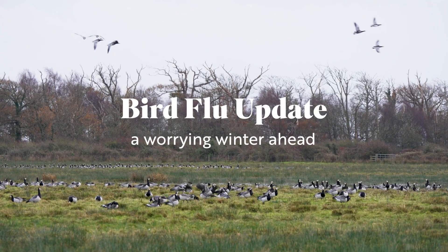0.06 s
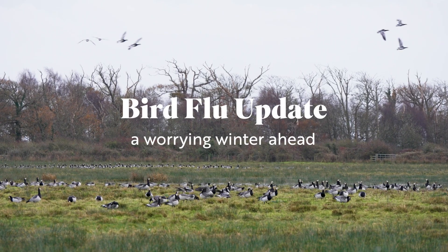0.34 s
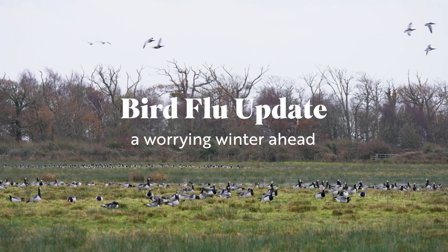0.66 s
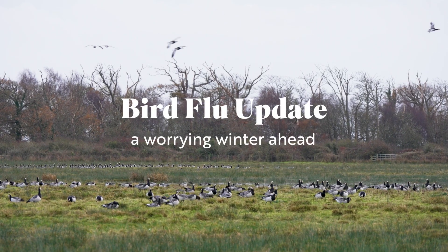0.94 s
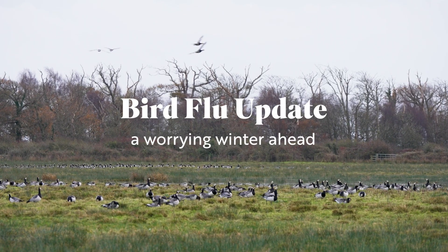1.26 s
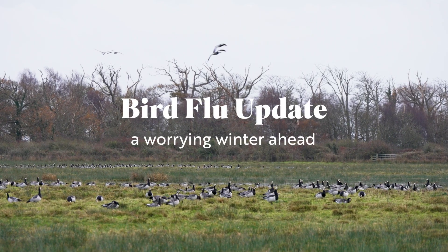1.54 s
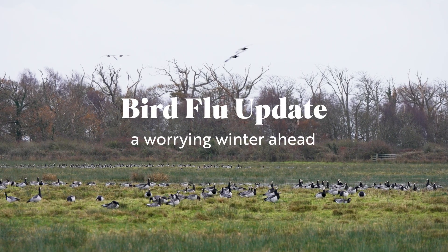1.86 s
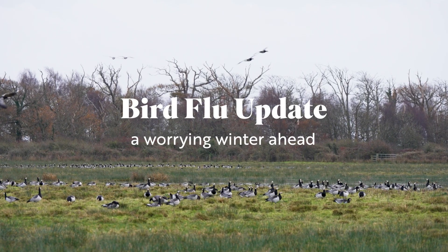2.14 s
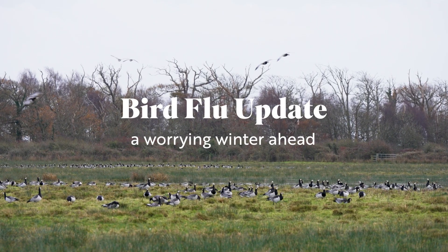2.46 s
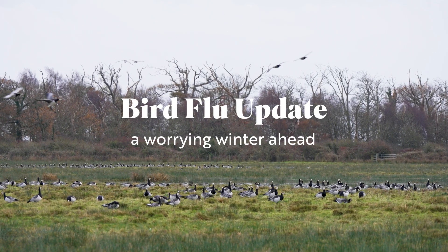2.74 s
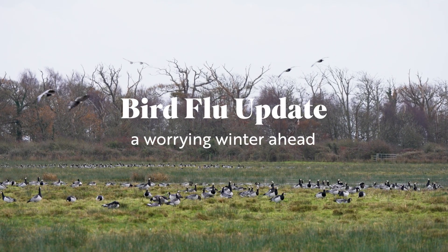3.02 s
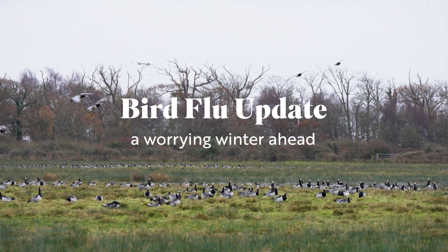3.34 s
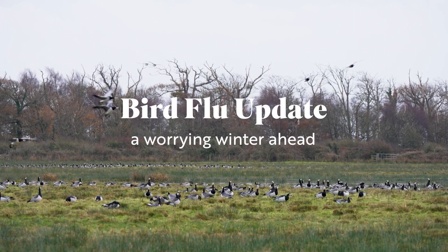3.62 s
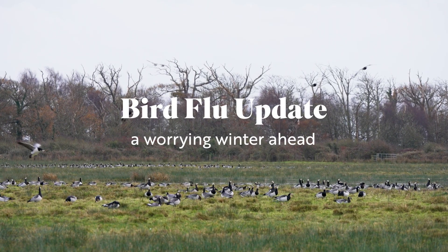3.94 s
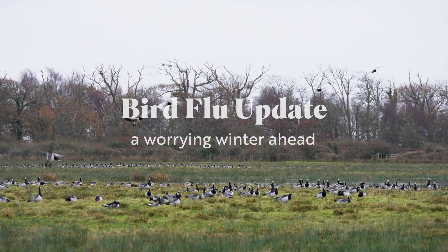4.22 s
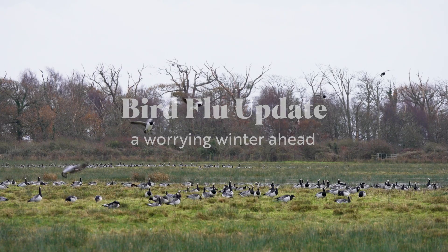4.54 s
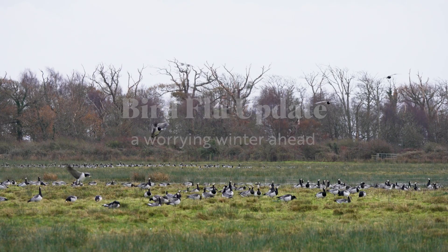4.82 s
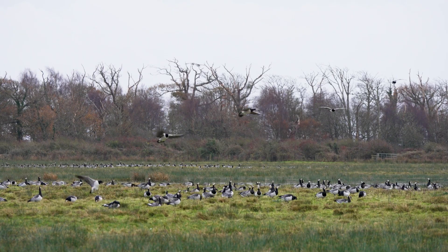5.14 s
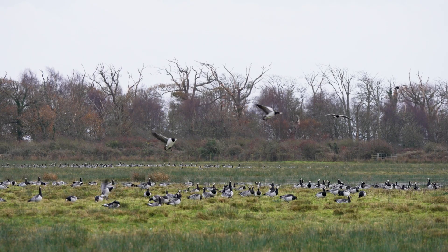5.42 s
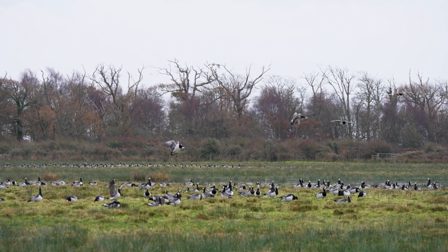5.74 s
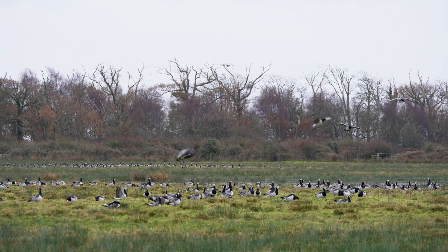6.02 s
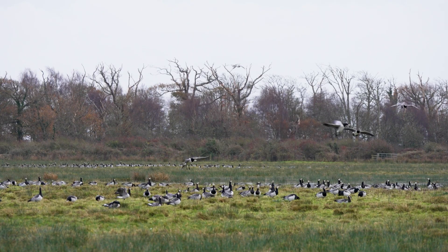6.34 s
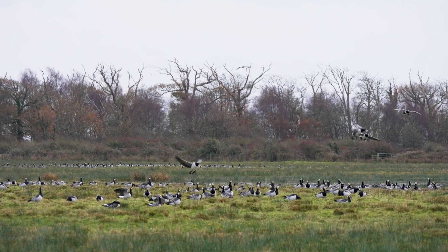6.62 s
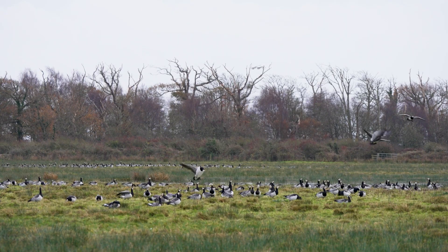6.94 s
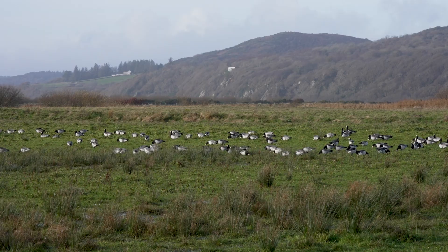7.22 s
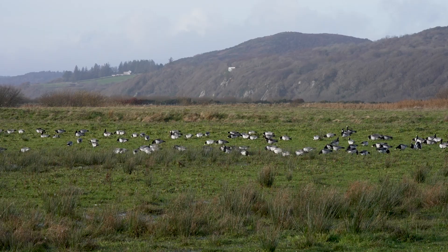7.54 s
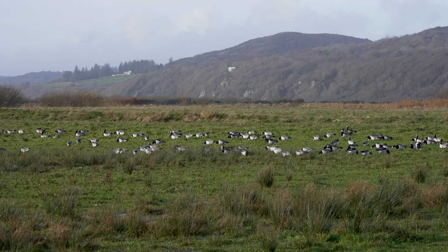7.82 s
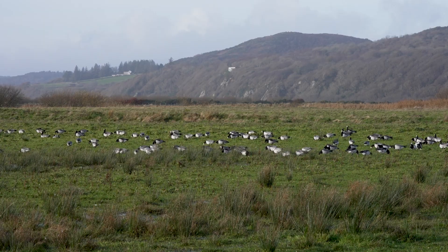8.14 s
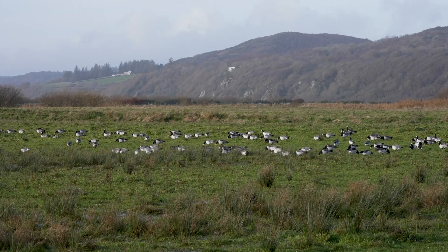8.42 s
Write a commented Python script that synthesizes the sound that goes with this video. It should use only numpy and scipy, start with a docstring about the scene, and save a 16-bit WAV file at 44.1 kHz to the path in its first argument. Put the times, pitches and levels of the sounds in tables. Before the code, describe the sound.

Out in a field, overlapping nasal goose honks stand out from a distant chattering flock, with a faint echo from trees. A close bird yelps a few times at the start, as wind briefly buffets the microphone. Later the wind rumbles up again under shriller calls and low grunts. Finally the chorus drops away, leaving a handful of soft, creaky geese in still country air.

```python
"""A large flock of geese yaps on open grassland, near birds over a babble of far ones, with soft grunts.
Each honk rises and falls in pitch as membranes clap in the bird's chest and ring its throat and bill.
Early on, gusts bump the microphone and a close bird gives clear yelps. From about four seconds the
breeze swells and shrill calls join in. After seven seconds the field fades into a quieter one,
where a few geese call in low, creaky pairs."""
import sys
import numpy as np
from scipy import signal
from scipy.fft import rfft, irfft, next_fast_len
from scipy.io import wavfile

SR = 44100
rng = np.random.default_rng(int(sys.argv[2]) if len(sys.argv) > 2 else 0)


def log_audio(samples):
    """Write samples as a 16-bit WAV file to the path given in sys.argv[1]."""
    # one column per channel
    frames = np.atleast_2d(samples).T
    # limit to full scale, then quantise
    limited = np.clip(frames, -1, 1)
    pcm = np.round(limited * 32767).astype(np.int16)
    wavfile.write(sys.argv[1], SR, pcm)


N = 378378


def undb(db):
    """Turn decibels into a gain to multiply by."""
    return 10 ** (np.asarray(db) / 20)


def unit(x):
    """Scale a sound to an average strength (rms) of 1."""
    return x / np.sqrt(np.mean(x ** 2) + 1e-20)


def curve(rows, t):
    """Join the points of a table with straight lines."""
    rows = np.asarray(rows)
    return np.interp(t, rows[:, 0], rows[:, 1])


def add(track, start_s, sound):
    """Mix a sound into a track."""
    i = int(start_s * SR)
    a, b = max(i, 0), min(i + len(sound), N)
    if b > a:
        track[a:b] += sound[a - i:b - i]


def wander(n, rate_hz):
    """Drift to a new random value `rate_hz` times a second."""
    at = np.arange(n) * rate_hz / SR
    points = int(at[-1]) + 2
    return np.interp(at, np.arange(points), rng.standard_normal(points))


def resonance(f, hz, q):
    """Favour the frequencies near `hz`; a higher `q` rings more narrowly."""
    return (1 + 1j * q * (f / hz - hz / f)) ** -2


def passband(f, low_hz, high_hz, order):
    """Let through one band; a higher order gives steeper edges."""
    return ((1 + (low_hz / f) ** order) * (1 + (f / high_hz) ** order)) ** -.5


def noise(spectrum):
    """Noise shaped by rows of frequency_hz, gain_db."""
    f = np.fft.rfftfreq(N, 1 / SR) + 1
    hz, db = np.transpose(spectrum)
    gain = undb(np.interp(np.log(f), np.log(hz), db))
    return unit(irfft(rfft(rng.standard_normal(N)) * gain, N))


# How much of the big flock's field is heard: time_s, gain_db
FIELD_FADE = [(0, 2), (6.6, 1.5), (7.0, -0.5), (7.25, -6), (7.45, -9.5), (7.6, -32), (8.58, -56)]


def big_field(t):
    """The big field's gain, which falls away after seven seconds."""
    return undb(curve(FIELD_FADE, t))


# The tone of the air in each field: frequency_hz, gain_db
BIG_FIELD_AIR = [(20, 1.5), (60, -11), (120, -1), (200, 3), (280, 1.5), (400, -9), (550, -18.5),
                 (1000, -9.5), (3000, -22.5), (8000, -27), (16000, -28)]
QUIET_FIELD_AIR = [(20, 1.5), (60, -3), (150, -6), (300, -8), (600, -11.5), (1000, -14.5), (2000, -24),
                   (5000, -33.5), (16000, -34.5)]


def country_air(t, big_db=-52, quiet_db=-59):
    """The low drone of the countryside gives way to a quieter one."""
    big = noise(BIG_FIELD_AIR) * undb(big_db + 1.3 * wander(N, 9.2))
    quiet = noise(QUIET_FIELD_AIR) * undb(quiet_db)
    fade = big_field(t)
    return fade * big + np.sqrt(np.clip(1 - fade, 0, 1)) * quiet


# The tone of the hiss: frequency_hz, gain_db
HISS_TONE = [(30, 3), (300, 8.5), (1000, -5.5), (3000, -20.5), (6000, 5), (16000, 2.5)]


def wide_hiss(t):
    """A faint hiss sounds wide because left and right are opposites."""
    hiss = noise(HISS_TONE) * (big_field(t) * undb(-69.5) + undb(-92))
    return np.array([hiss, -hiss])


# The wind's rumble: frequency_hz, gain_db
WIND_TONE = [(15, -8), (35, -2.5), (70, -3), (110, -11.5), (200, -21), (400, -37.5), (900, -63)]
# The breeze rising and dying away: time_s, level_db
BREEZE = [(0, -62), (1, -67), (2.7, -65), (3.6, -53.5), (4.4, -47.5), (5.2, -48), (5.9, -41), (6.7, -52.5),
          (7.2, -57.5), (7.45, -75), (8.58, -64.5)]
# Short gusts: peak_s, half_width_s, level_db
GUSTS = [(.25, 0.058, -47), (.45, 0.034, -37.5), (.57, 0.036, -50.5), (4.1, 0.035, -42), (4.4, 0.084, -41),
         (4.8, .025, -55)]


def wind(t):
    """Gusts ride on a slow breeze and buffet the microphone."""
    gusts = sum(undb(db) * np.exp(-((t - peak_s) / width_s) ** 2) for peak_s, width_s, db in GUSTS)
    return noise(WIND_TONE) * (undb(curve(BREEZE, t)) + gusts)


def treeline(x, fade_s=1.0, rise_s=0.0053, echo_db=-27):
    """Trunks and rough ground scatter a thin, dull echo."""
    t = np.arange(SR) / SR
    scatter = rng.standard_normal(SR) * undb(-60 * t / fade_s) * (1 - np.exp(-t / rise_s))
    dull = signal.sosfilt(signal.butter(2, 3000, fs=SR, output="sos"), scatter)
    return undb(echo_db) * signal.fftconvolve(x, unit(dull) / np.sqrt(SR))[:N]


def soft_ground(x, dip_hz=550, width_hz=100, dip_db=-6):
    """The bounce off soft pasture weakens a band just under the calls, so their falling tails fade."""
    f = np.fft.rfftfreq(N, 1 / SR)
    return irfft(rfft(x) * undb(dip_db * np.exp(-((f - dip_hz) / width_hz) ** 2)), N)


def over_grass(x, scatter_db=-4, decay_s=0.0043, size=600):
    """Tiny echoes off tufts of grass blur each call in its own way."""
    echoes = rng.standard_normal(size) * np.exp(-np.arange(size) / SR / decay_s)
    path = unit(echoes) * undb(scatter_db) / np.sqrt(size)
    path[0] += 1  # the direct sound
    return signal.fftconvolve(x, path)[:len(x)]


def buzz(phase, harmonics):
    """One sharp pulse per cycle, made of equally strong harmonics."""
    half = np.pi * (phase % 1) + 1e-9
    return unit(np.sin((2 * harmonics + 1) * half) / np.sin(half) - 1)


def voice_box(hz, repeat, slip, rough, jitter=0.043, flutter=0.62):
    """Membranes clap once a cycle; `slip` stresses one clap in every `repeat`, and air rasps through."""
    n, slip = len(hz), np.clip(slip, 0, 1)
    phase = np.cumsum(hz * (1 + (0.0036 + jitter * rough) * wander(n, 500))) / SR  # in cycles
    claps = (1 - slip) * buzz(phase, 12) + slip * buzz(phase / repeat, 12 * repeat)
    rasp = rng.standard_normal(n) * (1 + np.cos(2 * np.pi * phase / repeat))
    return unit(claps) * (1 + flutter * rough * wander(n, 271.3)) + rough * rasp, phase


def throat_and_bill(source, phase, push, base_db, throat_hz, throat_db, bill_hz, bill_db,
                    throat_q, pipe_db=-4, bill_q=1.55):
    """The windpipe passes the base note, the throat gives the honk and the bill adds a nasal edge."""
    n = len(source)
    size = next_fast_len(n + 256)
    f, spectrum = np.fft.rfftfreq(size, 1 / SR) + 1, rfft(source, size)
    ring = resonance(f, throat_hz, throat_q) * passband(f, 0.28 * throat_hz, 1.696 * throat_hz, order=10)
    # a lower windpipe ring comes forward as the bill shuts at the end
    pipe = irfft(spectrum * ring * np.abs(resonance(f, hz=1130, q=5)), size)[:n]
    shutting = 1 + 5 * np.linspace(0, 1, n) ** 6
    throat = irfft(spectrum * ring, size)[:n] + undb(pipe_db) * pipe * shutting
    # the bill rings a quarter cycle apart from the throat, so the two do not cancel
    quarter_turn = 1j * np.exp(1j * np.angle(ring))
    edge = np.abs(resonance(f, bill_hz, bill_q)) * passband(f, 1900, 6870, order=10)
    bill = irfft(spectrum * quarter_turn * edge, size)[:n] * push ** 0.16  # opens with the push of air
    base = np.sin(2 * np.pi * phase)
    return undb(base_db) * unit(base) + undb(throat_db) * unit(throat) + undb(bill_db) * unit(bill)


def honk(length_s, top_hz, top_at, arch, repeat, slip, rough, *tone, attack=.9, swell=1.05,
         wobble=.008, collapse=.05, settling=.6, throat_q=2.05, pipe_db=-4, bill_q=1.6):
    """One push of air: pitch and loudness rise and fall, and a hoarse start settles to a cleaner tail."""
    progress = np.linspace(0, 1, int(length_s * SR))
    push = np.abs(np.sin(np.pi * progress ** attack))
    bend = 1 - arch * (progress - top_at) ** 2
    # the pitch wobbles, then collapses as the air runs out
    pitch = top_hz * (bend + wobble * wander(len(progress), 70.5) - collapse * progress ** 10)
    # the membranes slip to their slow rate most when the push is weak
    slipping = slip * (1 + .5 * (.8 - push))
    hoarse = rough * (1.05 + settling * np.cos(np.pi * progress))
    source, phase = voice_box(pitch, repeat, slipping, hoarse)
    call = throat_and_bill(over_grass(source), phase, push, *tone, throat_q, pipe_db, bill_q)
    return 1.29 * push ** swell * call


# How excited the far birds are: time_s, gain_db
EXCITEMENT = [(0, 6.5), (.5, 2), (2.3, 2), (3, 4), (4, -1.5), (5, 1.5), (6, -1), (6.8, 2), (7.5, -1)]


def far_geese(t, count=300, level_db=-57.5, spread_db=11, pitch_hz=850, throat_hz=1780, bill_hz=4100):
    """Hundreds of far calls, each with its own pitch and throat, merge into a babble."""
    out = np.zeros(N)
    top_at, slip, rough = 0.3422, 1.0, 0.12
    for k, (late, long, high, bright, loud, deep) in enumerate(rng.uniform(-1.1, 1, (count, 6))):
        db = level_db + spread_db * loud
        shape = .1 + 0.028 * long, pitch_hz * (1 + .11 * high), top_at, 0.477 + 0.19 * deep
        tone = db - 20, throat_hz * (1 + 0.14 * bright), db, bill_hz, db - 23
        start_s = (k + 2 * late) / count * N / SR - .05
        add(out, start_s, honk(*shape, 2 + k % 2, slip, rough, *tone))
    return big_field(t) * undb(curve(EXCITEMENT, t)) * soft_ground(out)


# Soft, low grunts between the honks: middle_s, pitch_hz, level_db
GRUNTS = [(0.029, 301, -48), (0.481, 268.4, -44.5), (0.921, 255.6, -45.5), (1.822, 287, -48.5),
          (2.35, 287, -47.5), (2.95, 275, -46.5), (3.599, 301, -45), (3.659, 279, -49), (4.028, 324, -51.5),
          (4.302, 270.5, -46.5), (6.579, 251, -47), (6.701, 290, -53), (7.337, 295, -53), (7.64, 296, -56),
          (7.94, 286, -57), (8.241, 263, -54)]


def grunting_geese(length_s=.09, fall=0.16, overtone_db=-22):
    """The birds keep in touch with short, dull notes that sag in pitch."""
    out = np.zeros(N)
    from_middle = np.linspace(-.5, .5, int(length_s * SR))
    for middle_s, hz, db in GRUNTS:
        pitch = hz * (1 - fall * from_middle + 0.013 * wander(len(from_middle), 42))
        angle = 2 * np.pi * np.cumsum(pitch) / SR
        note = np.sin(angle) + undb(overtone_db) * np.sin(2 * angle)
        add(out, middle_s - length_s / 2, undb(db) * np.cos(np.pi * from_middle) ** 2 * note)
    return out


# Low creaks: start_s, length_s, pitch_hz, repeat_cycles, base_db, throat_hz, throat_db, bill_db
CREAKS = [(7.454, 0.1, 697, 2, -72, 1940, -57, -59.5), (7.57, 0.13, 744, 3, -76, 1900, -55, -86),
          (7.684, .091, 737, 3, -58.5, 1840, -56.5, -71.5), (7.807, 0.097, 806, 2, -59, 2060, -50.5, -66),
          (7.879, .11, 830, 3, -69, 2320, -53.5, -66), (8.087, 0.11, 738, 3, -56.5, 2070, -58.5, -64.5),
          (8.181, 0.095, 774, 3, -59, 2270, -53.5, -67.5), (8.355, 0.097, 742, 3, -53.5, 2320, -56, -60.5),
          (8.453, .098, 741, 2, -52.5, 2140, -55.5, -54.5), (8.543, .072, 757, 1, -61, 2020, -63, -71)]


def creaking_geese(top_at=.42, arch=0.519, slip=1, rough=0.45, bill_hz=3930):
    """Birds in the quiet field creak as their membranes slip to half or third rate."""
    out = np.zeros(N)
    for start_s, length_s, hz, repeat, base_db, throat_hz, throat_db, bill_db in CREAKS:
        tone = base_db, throat_hz, throat_db, bill_hz, bill_db
        add(out, start_s, honk(length_s, hz, top_at, arch, repeat, slip, rough, *tone,
                               swell=1.04, wobble=0.014, throat_q=1.93, pipe_db=-5, bill_q=2.3))
    return out


# Clear notes: start_s, length_s, pitch_hz, top_at (0-1 along the call), throat_hz, throat_db
CLEAR_NOTES = [(7.58, 0.081, 695, 0.6, 2570, -57.5), (7.799, 0.092, 764, 0.27, 2110, -51),
               (7.886, .078, 719, 0.68, 2730, -55), (8.093, .086, 670, .48, 2150, -49),
               (8.359, 0.073, 674, .44, 2290, -48)]


def bugling_geese(arch=.64, repeat=1, slip=0, rough=0.2, bill_hz=3630):
    """A second voice sounds over some creaks, clear because its membranes do not slip."""
    out = np.zeros(N)
    for start_s, length_s, hz, top_at, throat_hz, db in CLEAR_NOTES:
        tone = db - 19, throat_hz, db, bill_hz, db - 15
        add(out, start_s, honk(length_s, hz, top_at, arch, repeat, slip, rough, *tone,
                               swell=.8, throat_q=4.0, pipe_db=-18))
    return out


# Shrill calls: start_s, length_s, pitch_hz, repeat_cycles, base_db, throat_db, bill_hz, bill_db
SHRIEKS = [(4.502, 0.079, 930, 1, -73, -45, 6660, -55.5), (4.8, 0.065, 820, 2, -75, -53, 5230, -59),
           (5.007, 0.15, 807, 2, -68, -46.5, 5050, -58), (5.571, 0.11, 938, 2, -82, -48, 5200, -56),
           (5.808, 0.063, 920, 2, -69, -71, 4930, -62.5), (6.027, 0.18, 929, 2, -66, -56.5, 5000, -60),
           (6.359, 0.099, 898, 2, -53, -51, 4070, -62), (6.478, .11, 857, 2, -60, -42, 4970, -57.5),
           (6.587, 0.093, 886, 1, -58, -43, 5500, -54.5), (6.623, 0.1, 908, 2, -53, -40, 4450, -64),
           (6.699, 0.065, 918, 2, -53.5, -56, 4260, -61), (6.862, 0.14, 805, 2, -58.5, -47, 5230, -60),
           (6.967, .13, 888, 2, -55.5, -44, 4270, -64)]


def shrieking_geese(top_at=0.333, arch=0.326, slip=0.74, rough=0.3, throat_hz=1870):
    """Thin, falling calls ring brightly through a wide open bill."""
    out = np.zeros(N)
    for start_s, length_s, hz, repeat, base_db, throat_db, bill_hz, bill_db in SHRIEKS:
        tone = base_db, throat_hz, throat_db, bill_hz, bill_db
        add(out, start_s, honk(length_s, hz, top_at, arch, repeat, slip, rough, *tone,
                               attack=0.82, swell=0.8, bill_q=2.06))
    return out


# Long, clear yelps: start_s, length_s, pitch_hz, catch_depth (0-1), level_db, bill_vs_throat_db
YELPS = [(0.664, 0.15, 870, .065, -26, -21), (1.29, 0.14, 861, 0.05, -26, -26.5),
         (1.493, 0.103, 852, 0.05, -34, -24), (2.025, .13, 861, 0, -32.5, -17.5)]


def yelping_goose(top_at=.54, arch=0.43, sag_db=9, crack_s=0.0096):
    """A close bird's voice cracks into a clean note, catches in the middle and cracks out again."""
    out = np.zeros(N)
    for start_s, length_s, hz, depth, db, bill_db in YELPS:
        t = np.arange(start_s, start_s + length_s, 1 / SR)
        progress = (t - start_s) / length_s
        catch = depth * np.exp(-((progress - .46) / 0.138) ** 2)  # dips both pitch and level
        pitch = hz * (1 - arch * (progress - top_at) ** 2 - catch)
        push_db = db - sag_db * (2 * (progress - top_at)) ** 2 - 65 * catch
        push = undb(push_db) * signal.windows.tukey(len(t), .22)
        crack = np.exp(-((t - t[0]) / (2 * crack_s)) ** 4) + np.exp((t - t[-1]) / crack_s)
        source, phase = voice_box(pitch, repeat=3, slip=crack, rough=0.027 + crack)
        call = throat_and_bill(source, phase, push, base_db=-15.5, throat_hz=1650, throat_db=0,
                               bill_hz=3600, bill_db=bill_db, throat_q=2.6)
        add(out, start_s, push * call)
    return out


# Near honks: start_s, length_s, pitch_hz, repeat_cycles, roughness (0-1), throat_hz, throat_db, bill_db
HONKS = [(-.042, 0.083, 918, 1, 0.08, 1520, -32.5, -73), (0.034, .19, 804, 3, 0.41, 1530, -33.5, -52.5),
         (.124, 0.11, 897, 2, 0.14, 1690, -33.5, -54), (.212, 0.098, 857, 2, 0.49, 1660, -39, -58.5),
         (0.351, .13, 849, 2, 0.61, 1610, -33.5, -59.5), (0.563, .125, 887, 2, 0.16, 2180, -39.5, -50),
         (0.621, 0.08, 800, 2, 0.1, 2060, -37, -55), (0.868, 0.086, 903, 2, 0.16, 2020, -38, -59.5),
         (0.923, .092, 814, 3, 0.17, 1430, -34.5, -64), (1.06, .12, 890, 2, 0.31, 1680, -33, -57),
         (1.209, 0.13, 897, 2, 0.5, 1520, -42, -83), (1.399, 0.094, 809, 3, 0.4, 1690, -37.5, -60),
         (1.557, .075, 745, 2, 0.42, 1180, -40, -67), (1.63, 0.14, 874, 2, 0.54, 1740, -40.5, -60),
         (1.793, 0.16, 889, 2, 0.41, 1760, -44.5, -61), (2.027, .11, 850, 3, 0.42, 1380, -37.5, -69),
         (2.314, 0.098, 881, 2, 0.3, 1680, -34.5, -56), (2.421, 0.077, 869, 2, 0.66, 1740, -44.5, -59.5),
         (2.458, 0.12, 770, 3, 0.36, 1520, -37, -64), (2.585, 0.12, 894, 2, 0.53, 1810, -34, -54.5),
         (2.778, 0.071, 944, 2, 0.25, 1930, -40, -59), (2.823, 0.075, 848, 2, 0.57, 1710, -38, -65),
         (2.874, .13, 767, 3, 0.65, 1460, -37, -61.5), (3.082, 0.15, 836, 2, 0.34, 1740, -39.5, -66),
         (3.143, 0.13, 907, 2, 0.21, 1810, -31, -58), (3.212, 0.088, 802, 3, 0.6, 1630, -43, -64),
         (3.277, 0.14, 903, 2, 0.49, 2000, -42, -58), (3.42, .115, 897, 3, 0, 1320, -37, -74),
         (3.626, .12, 786, 3, 0.64, 1920, -43.5, -63), (3.791, 0.14, 893, 2, 0.23, 1840, -35, -62),
         (3.918, 0.079, 873, 3, 0.38, 1620, -41.5, -64), (4.017, 0.11, 837, 2, 0.9, 1920, -45, -80),
         (4.331, 0.12, 900, 2, 0.41, 1820, -34.5, -57.5), (4.505, 0.11, 776, 3, 0.2, 1760, -39, -64),
         (4.682, 0.09, 790, 3, 0.14, 1420, -42, -87), (4.899, 0.13, 895, 2, 0.38, 1740, -34.5, -61),
         (5.249, .12, 799, 3, .4, 1490, -42.5, -71), (5.321, 0.097, 880, 2, 0.3, 1550, -37, -58.5),
         (5.448, .084, 899, 3, 0.27, 1810, -35, -70), (5.669, 0.097, 898, 2, 0.75, 2020, -45.5, -72),
         (5.924, 0.12, 795, 3, 0.3, 1650, -42, -67), (6.214, .098, 848, 2, 0.22, 1720, -40, -58),
         (7.071, 0.08, 924, 2, 0.37, 1790, -47.5, -81), (7.26, 0.17, 737, 3, 0.78, 1750, -51.5, -67)]


def near_geese(top_at=.39, arch=0.478, slip=.78, strong_db=-33):
    """These honks stand out of the flock; each bird bends its pitch a little differently."""
    out = np.zeros(N)
    for row, (late, deep) in zip(HONKS, rng.uniform(-1.006, 1, (len(HONKS), 2))):
        start_s, length_s, hz, repeat, rough, throat_hz, throat_db, bill_db = row
        shape = length_s, hz, top_at + 0.118 * late, arch + 0.158 * deep
        # in weaker honks the base note sinks further under the throat and the bill rings higher
        weaker_db = max(strong_db - throat_db, 0)
        base_db = throat_db - 15.5 - 0.8 * weaker_db
        bill_hz = 3980 + 42 * weaker_db
        tone = base_db, throat_hz, throat_db, bill_hz, bill_db
        add(out, start_s, honk(*shape, repeat, slip, rough, *tone, attack=0.86, swell=1.08,
                               wobble=0.0102, collapse=0.057, settling=0.79, pipe_db=-2.5, bill_q=1.35))
    return out


def scene():
    """Birds, wind and country air come from the front; only the faint hiss has width."""
    t = np.arange(N) / SR
    near = soft_ground(near_geese() + shrieking_geese() + yelping_goose())
    near += creaking_geese() + bugling_geese() + grunting_geese()
    far = far_geese(t)
    # the far birds stand closer to the trees, so more of their sound comes back as echo
    echo = big_field(t) * treeline(near + undb(14) * far)
    return near + far + echo + wind(t) + country_air(t) + wide_hiss(t)


def record(dry, top_hz=15700):
    """Cut off the highest treble."""
    return signal.sosfilt(signal.ellip(10, .2, 70, top_hz, fs=SR, output="sos"), dry)


dry = scene()
out = record(dry)
log_audio(out)
```